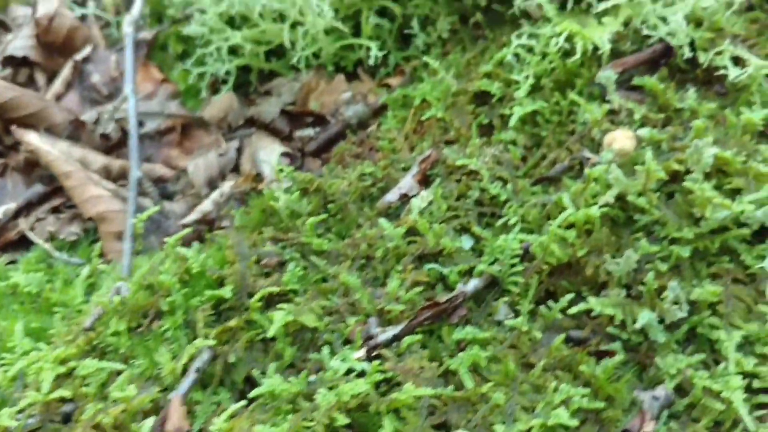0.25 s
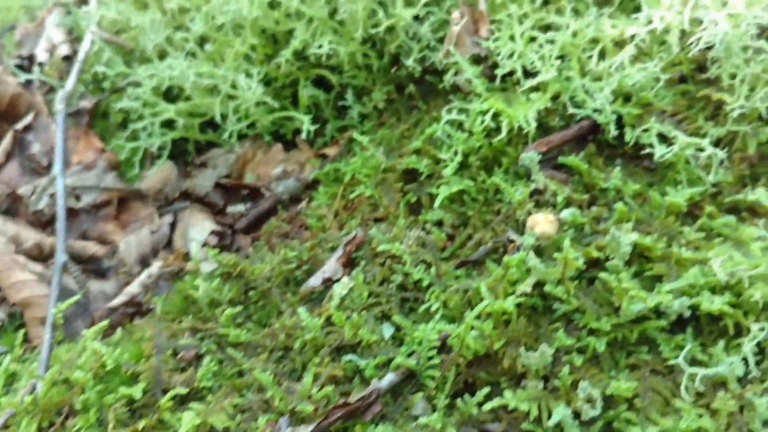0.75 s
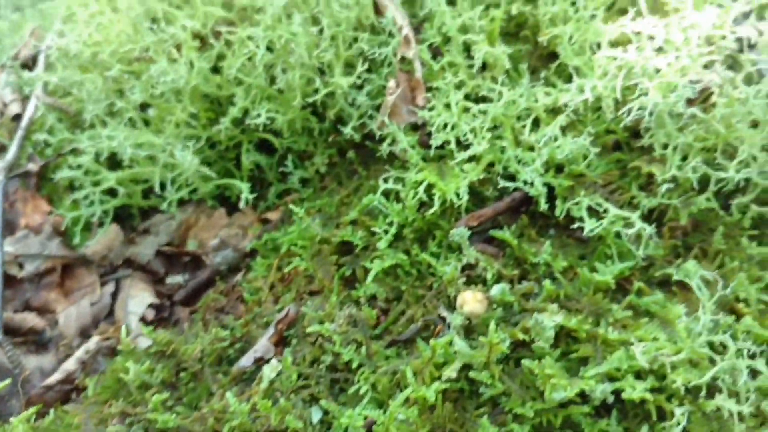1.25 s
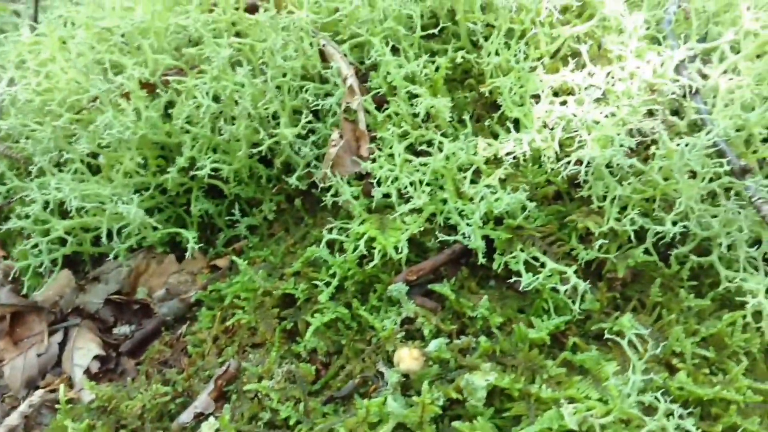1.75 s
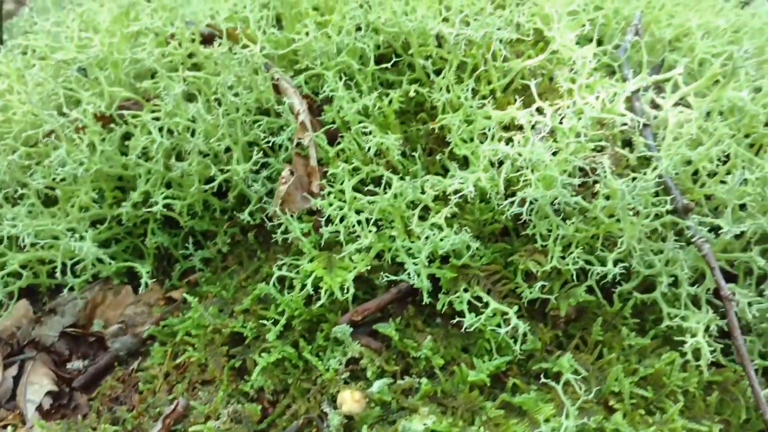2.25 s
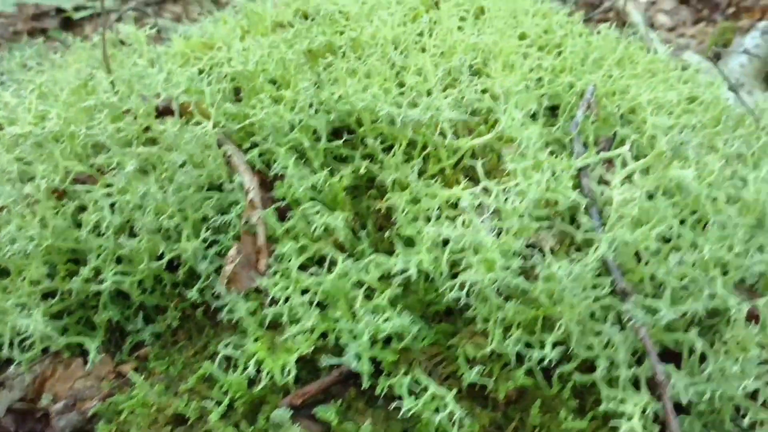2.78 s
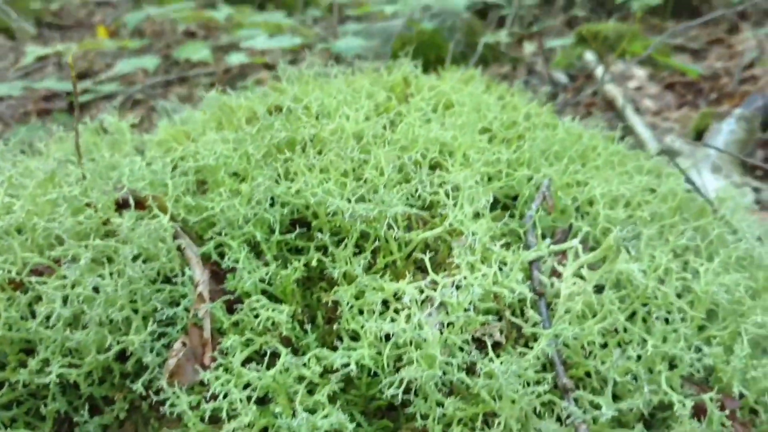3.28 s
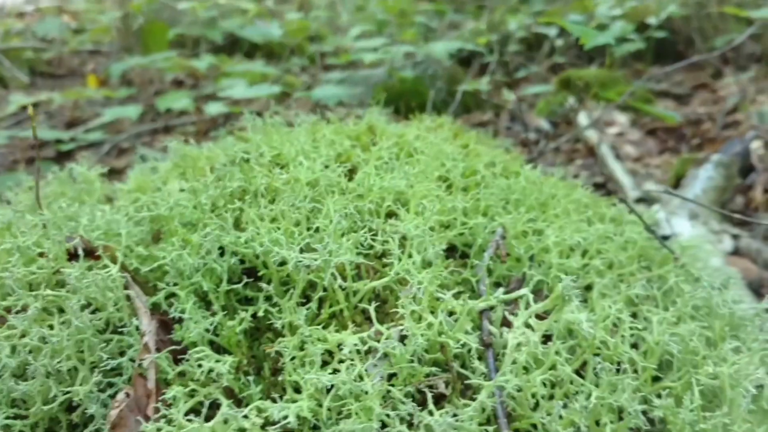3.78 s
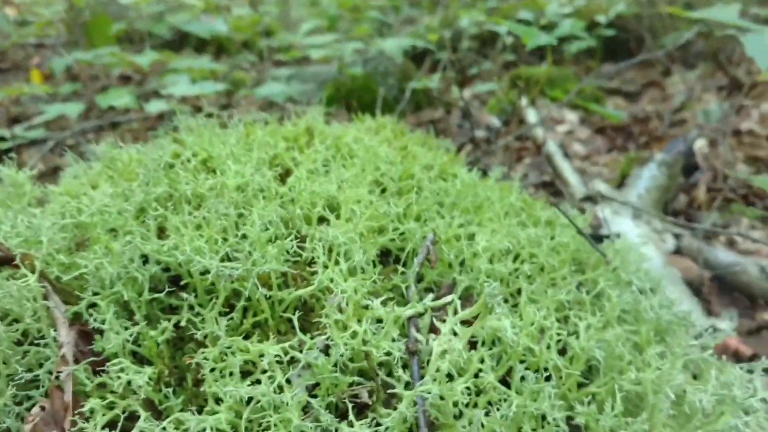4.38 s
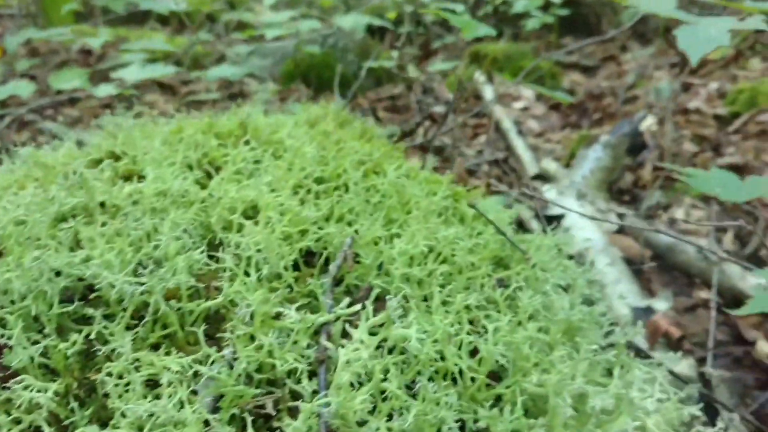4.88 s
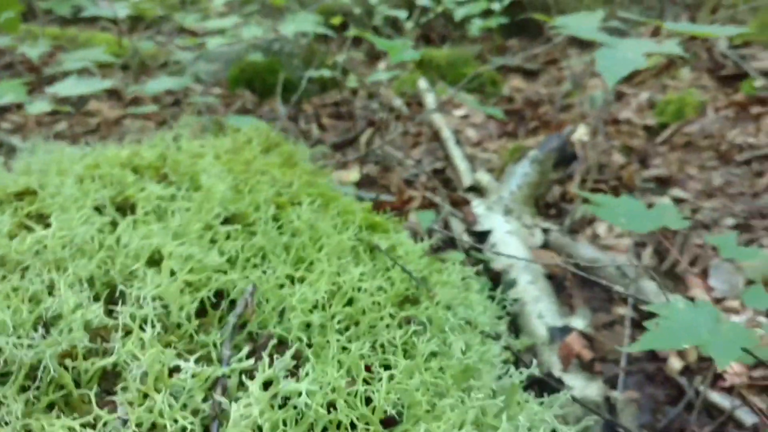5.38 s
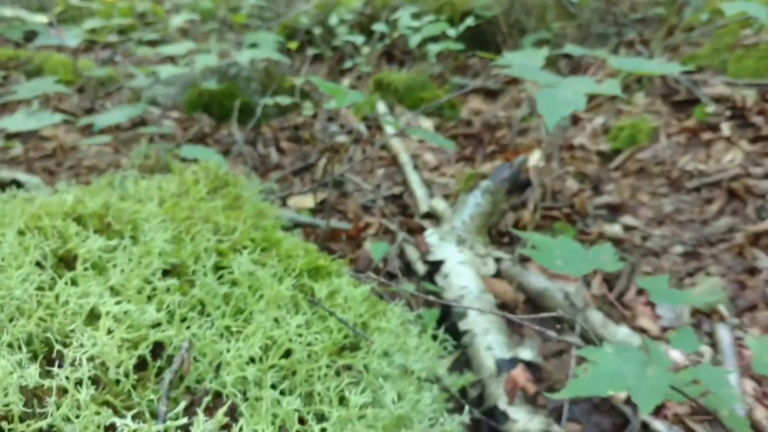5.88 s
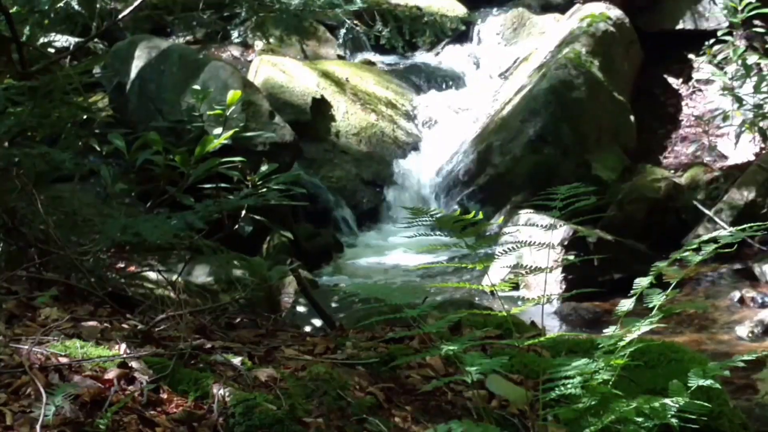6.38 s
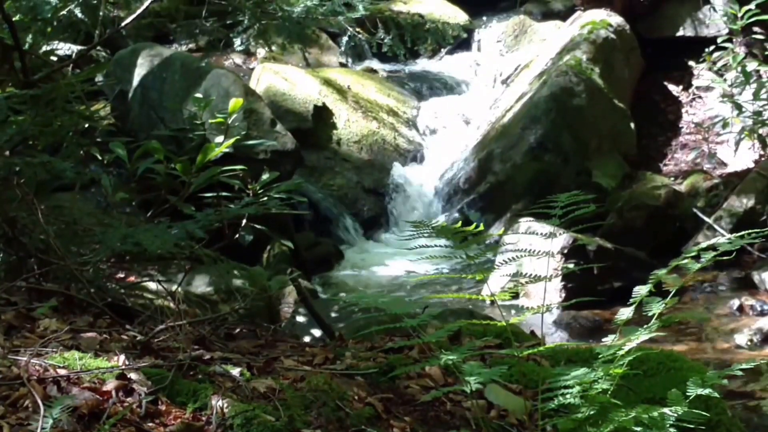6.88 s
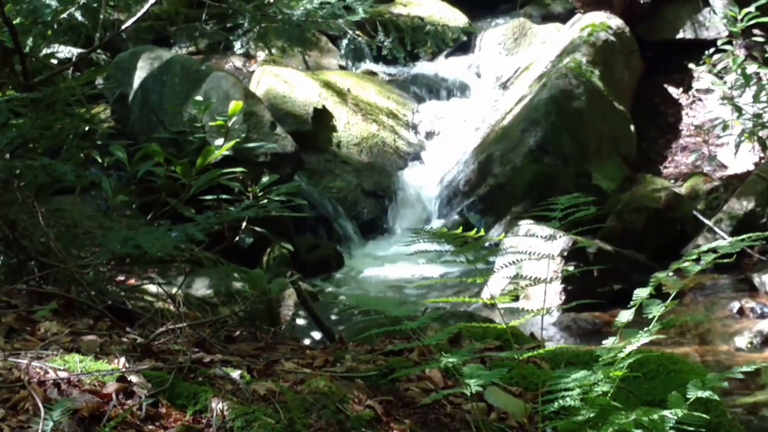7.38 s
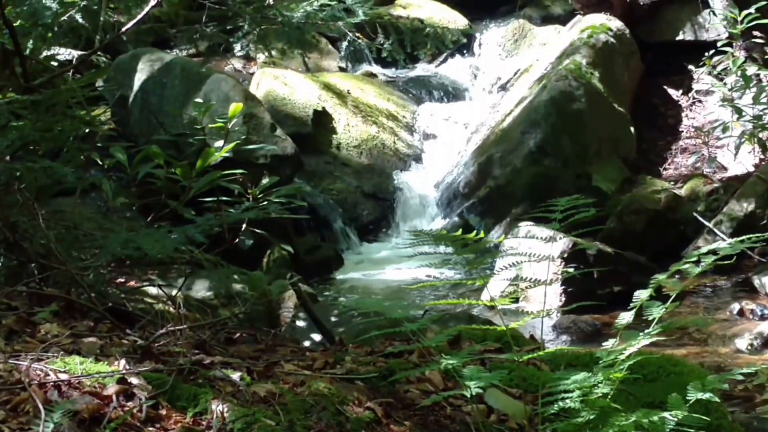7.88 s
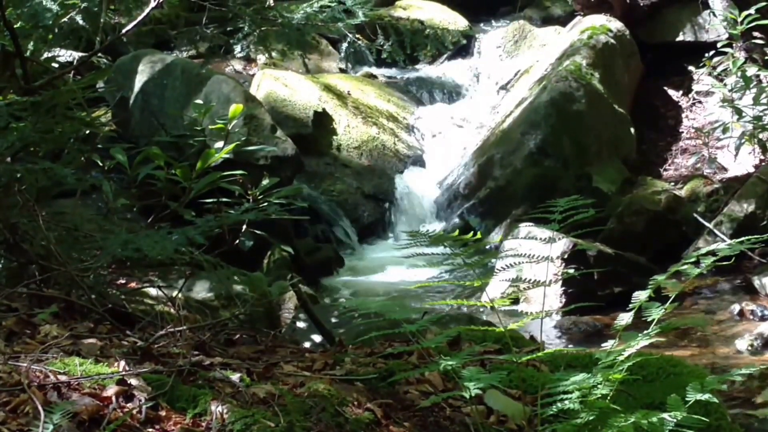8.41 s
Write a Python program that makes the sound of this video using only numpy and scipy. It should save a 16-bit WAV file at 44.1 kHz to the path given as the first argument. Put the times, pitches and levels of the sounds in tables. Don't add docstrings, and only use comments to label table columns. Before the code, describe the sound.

Quiet, blurred water noise from far off fills the first part, with muffled handling bumps clustering late on the right side. Sound drops out for an instant, then swells quickly into near white water among rocks: a much louder, wide, bright wash, irregular round gurgles and small surges. Outdoor stereo from a small handheld camera, slightly hollow and phasey.

```python
import sys
import numpy as np
from scipy import signal
from scipy.fft import rfft, irfft, next_fast_len
from scipy.io import wavfile
from scipy.ndimage import uniform_filter1d

SR = 44100
rng = np.random.default_rng(int(sys.argv[2]) if len(sys.argv) > 2 else 0)


def volts_from_decibels(level):
    exponent = np.asarray(level, float) / 20
    return 10 ** exponent


def wrap_up_sound(samples):
    columns = np.atleast_2d(samples).T
    tamed = np.clip(columns, -1, 1)
    steps = np.round(tamed * 32767).astype(np.int16)
    wavfile.write(sys.argv[1], SR, steps)


N = 381465
CUT_S, RESUME_S = 6.242, 6.35
TURN_S, TURN_LOUDER_DB, TURN_WARMTH_DB = 2.75, 2.0, 4.5
FADE_IN_DB, FADE_IN_S = -21, 0.11
POOL_RING_DB, POOL_RING_S, POOL_REST_DB = 3.5, 0.05, -1.5
GRIP_REST_DB = -60

# frequency in Hz, sum level in dB per Hz, difference minus sum in dB,
# likeness of difference to sum (0-1), phase of difference in rad.
FAR_WATER = [(60, -82, -3, .3, -.6), (104, -75, -8, .61, 0.13), (150, -63, -12, 0.85, -0.48),
             (224, -71, -9.5, .5, 0.2), (370, -75.5, -8.5, .55, -0.41), (710, -79, -3, .46, -0.0074),
             (1350, -82, -0.5, 0, -1.6), (2600, -82, 0.5, 0.2, -.4), (3660, -83, -.5, .1, -.4),
             (5240, -85.5, 0.5, .2, 0), (7700, -89.5, 0, 0.4, -.1), (10500, -95, -0.5, 0.3, 0),
             (12600, -99, -2, .1, .3), (14900, -105, -1, .1, 1.6)]
# frequency in Hz, sum level in dB per Hz, difference minus sum in dB,
# likeness of difference to sum (0-1), phase of difference in rad.
NEAR_WATER = [(60, -74.5, -13, .81, -2), (101, -62, -12, 0.85, -0.2), (150, -60.5, -8.5, .95, -1),
              (203, -53, -14, 0.73, -0.96), (430, -63, -6, 0.67, -1.16), (594, -56.5, -10, .78, -1.3),
              (740, -57, -6.5, .9, -1.3), (850, -63.5, -0.5, 0.82, -1.2), (1290, -64, -6.5, 0.45, -3),
              (2610, -67.5, 3, 0.39, -0.42), (3870, -69, -2, .39, 1.7), (4900, -69.5, -4, 0.18, 0.5),
              (8700, -75.5, 1, 0.52, -0.9), (15200, -84.5, -4, .09, 2.5)]
# peak time in seconds, peak level in dB, pitch in Hz, cycles above half height.
GLUGS = [(6.415, -33, 680, 2.1), (6.4523, -21, 590, 2.3), (6.4896, -15.5, 656, 3.3), (6.753, -19, 700, 2.2),
         (6.7936, -9.5, 610, 3), (6.898, -11, 620, 2.1), (7.0178, -15, 610, 5), (7.1997, -10, 654, 6.3),
         (7.2127, -12, 660, 1.5), (7.252, -12, 850, 1.7), (7.3134, -15, 745, 6.4), (7.395, -16, 604, 5),
         (7.4189, -13, 630, 2.2), (7.4261, -8.5, 674, 2.6), (7.4382, -16, 695, 2.6), (7.447, -18, 640, 4.2),
         (7.5035, -19, 750, 2.2), (7.6814, -13.5, 740, 2), (7.7222, -16, 746, 2.6), (7.8477, -20, 670, 2.2),
         (8.0037, -15.5, 760, 2.3), (8.0119, -16, 730, 3.1), (8.032, -26, 920, 4.8),
         (8.2449, -26, 694, 4.7), (8.4943, -16, 724, 1.8), (8.509, -26, 730, 4.1)]
# peak time in seconds, peak level in dB, pitch in Hz, cycles above half height.
PLOPS = [(6.424, -30, 1390, 2.2), (6.6025, -14.5, 1570, 2.4), (6.6407, -15.5, 1380, 3),
         (6.74, -10, 1290, 1.8), (6.795, -3, 1290, 2.8), (6.805, -11, 1260, 3.4), (7.021, -14, 1760, 5),
         (7.076, -14, 1770, 7.3), (7.1012, -11, 1900, 3.5), (7.1886, -15.5, 1240, 9.2),
         (7.2106, -9, 1360, 1.7), (7.3819, -16, 1290, 2.2), (7.5484, -13, 1380, 2), (7.755, -18, 1300, 2.4),
         (7.942, -14.5, 1430, 5.2), (8.006, -13, 1290, 4.3), (8.018, -16, 1250, 4.2),
         (8.3887, -14, 1350, 2.2), (8.433, -17, 1330, 3.8), (8.572, -15, 1480, 4.5)]
# start in seconds, peak level in dB, pitch in Hz, length in cycles, tick level in dB.
KNOCKS = [(2.911, -32, 170, 1.3, -36), (4.635, -32, 130, 2.1, -55), (4.769, -40, 150, 1.5, -36),
          (4.83, -24.5, 141, 1.8, -26), (4.877, -32, 140, 2., -41), (4.953, -29, 150, 2., -37),
          (5.1, -25, 112, 2.7, -55), (5.33, -47, 150, 1.5, -30), (5.3659, -28, 161, 1.8, -22),
          (5.59, -27, 125, 2, -20), (5.612, -25, 120, 0.94, -40), (5.738, -29, 130, 2.1, -45),
          (6.063, -27.5, 131, 5.6, -44)]
# centre in seconds, rumble level in dB, width at half height in seconds.
SHIFTS = [
    (4.84, -40.5, 0.23),
    (4.963, -48, 0.089),
    (5.15, -51, 0.33),
    (5.6, -48, 0.39),
    (5.97, -48, 0.078),
    (6.24, -44, 0.11),
]
# centre in seconds, level change in dB, width at half height in seconds.
SURGES = [
    (6.757, 2.5, 0.065),
    (6.862, -1.5, 0.2),
    (7.306, -1.1, 0.07),
    (7.44, 1, 0.14),
    (7.612, -3, 0.063),
    (8.04, -1, 0.087),
    (8.2, 0.5, 0.093),
    (8.53, 1.5, 0.29),
    (8.65, -3.5, .04),
]
# frequency in Hz, share (0-1).
CROSS_SHARE = [(100, 0.76), (1250, 0.72), (2500, 0.88), (3850, 0.71), (5200, 0.58), (7800, 0.47),
               (10400, 0.51), (11790, 0.2), (13000, .85), (14200, 0.5), (15200, 0.5)]


def evened(x):
    return x / np.sqrt(np.mean(x ** 2) + 1e-20)


def columns(table, at, warp=np.asarray):
    place, *values = np.transpose(table)
    return [np.interp(warp(at), warp(place), v) for v in values]


def add(mix, start_s, sound):
    part = mix[round(start_s * SR):][:len(sound)]
    part += sound[:len(part)]


def bump(t, centre_s, width_s):
    return np.exp(-4 * np.log(2) * ((t - centre_s) / width_s) ** 2)


def swell(hz, cycles, rise):
    half = int(2 * cycles * SR / hz)
    u = np.arange(-half, half) * hz / (cycles * SR)
    envelope = np.exp(-4 * np.log(2) * u ** 2)
    return envelope * np.cos(2 * np.pi * cycles * (u + rise * u ** 2 / 2))


def fizz(per_s, spread_db, cycles, count=22):
    out = np.zeros(N)
    size = volts_from_decibels(spread_db * np.minimum(rng.exponential(1, N), 4))
    bursts = size * (rng.random(N) < per_s / SR)
    kind = rng.integers(0, count, N)
    for k, hz in enumerate(np.geomspace(900, 16000, count)):
        ring = swell(hz, cycles, 0.19)
        out += hz * signal.oaconvolve(bursts * (kind == k), ring)[:N]
    return evened(out)


def water(table, control, low_hz, grain_share, grains, patchy_db, flicker_db):
    share = np.clip(grain_share, 0, 0.9)
    raw = np.sqrt(1 - share) * rng.standard_normal((2, N))
    raw[0] += np.sqrt(share) * grains
    raw[1] += np.sqrt(share) * np.roll(grains, SR)
    hz, t, z = signal.stft(raw, SR, nperseg=1024, noverlap=768)
    sum_db, diff_db, like, phase = (c[:, None] for c in columns(table, hz + 1, np.log))
    level_db, low_db = control(t)
    hump = np.exp(-np.log((hz[:, None] + 1) / low_hz) ** 2 / 0.21)

    chance = rng.standard_normal((len(t), 2 * len(hz) + 1)).T
    smooth = uniform_filter1d(uniform_filter1d(chance[1:], 14, 0), 12, 1)
    patches = evened(smooth).reshape(2, len(hz), -1)
    flicker = evened(uniform_filter1d(chance[0], 5))

    gain_db = sum_db + level_db + low_db * hump + patchy_db * patches[0] + flicker_db * flicker
    gain = volts_from_decibels(gain_db) * np.sqrt(SR / 2)
    like = np.clip(like, 0, 1)
    diff_gain = volts_from_decibels(diff_db + 0.7 * patches[1])
    diff = diff_gain * (like * np.exp(1j * phase) * z[0] + np.sqrt(1 - like ** 2) * z[1])
    ports = gain * np.array([z[0] + diff, z[0] - diff])
    return signal.istft(ports, SR, nperseg=1024, noverlap=768)[1][:, :N]


def turning(t):
    away = np.exp(-t / TURN_S)
    return TURN_LOUDER_DB * (0.35 - away), TURN_WARMTH_DB * away


def far_stream():
    bubbles = fizz(per_s=12000, spread_db=1.5, cycles=2.525)
    return water(FAR_WATER, turning, 485, 0.25, bubbles, patchy_db=0.59, flicker_db=0.27)


def thud(hz, cycles, rise, start):
    u = np.arange(int(2 * cycles * SR / hz)) * hz / (cycles * SR)
    shape = (1 - np.exp(-u / start)) * np.exp(-2.5 * u ** 2)
    return shape / shape.max() * np.sin(2 * np.pi * cycles * (u + rise * u ** 2 / 2))


def grip(t):
    return volts_from_decibels(GRIP_REST_DB) + sum(volts_from_decibels(db) * bump(t, s, width_s) for s, db, width_s in SHIFTS)


def hand():
    low = signal.butter(2, [85, 210], "bandpass", fs=SR, output="sos")
    lumps = volts_from_decibels(3.5 * evened(uniform_filter1d(rng.standard_normal(N), 1500)))
    rumble = evened(signal.sosfilt(low, rng.standard_normal(N)) * lumps)
    out = rumble * grip(np.arange(N) / SR)
    for s, db, hz, cycles, tick_db in KNOCKS:
        add(out, s, volts_from_decibels(db) * thud(hz, cycles, rise=-0.05, start=0.081))
        add(out, s, volts_from_decibels(tick_db) * thud(275, 0.99, rise=-0.22, start=0.2))
    return np.array([0.033 * out, -out])


def flow(t):
    fade_db = FADE_IN_DB * np.exp(-np.maximum(t - RESUME_S, 0) / FADE_IN_S)
    surge_db = sum(db * bump(t, s, width_s) for s, db, width_s in SURGES)
    crowd = sum(volts_from_decibels(db) * bump(t, s, POOL_RING_S) for s, db, hz, cycles in GLUGS)
    return fade_db + surge_db, POOL_REST_DB + POOL_RING_DB * np.tanh(crowd / 0.39)


def cascade():
    bubbles = fizz(per_s=9000, spread_db=2.5, cycles=3.1)
    return water(NEAR_WATER, flow, 690, 0.26, bubbles, patchy_db=0.9, flicker_db=0.84)


def pool():
    out = np.zeros(N)
    for s, db, hz, cycles in GLUGS + PLOPS:
        add(out, s - 2 * cycles / hz, volts_from_decibels(db - 7.5) * swell(hz, cycles, 0.092))
    return np.array([volts_from_decibels(1.5) * np.roll(out, shift=6), out])


def scene():
    t = np.arange(N) / SR
    before = np.clip((CUT_S - t) / 0.0022, 0, 1)
    after = np.clip((t - RESUME_S) / 0.0035, 0, 1)
    return before * (far_stream() + hand()) + after * (cascade() + pool())


def band_limit(x):
    return signal.sosfilt(signal.butter(12, 15200, fs=SR, output="sos"), x)


def record(dry):
    size = next_fast_len(N + 4096)
    hz = np.fft.rfftfreq(size, 1 / SR)
    delay_rad = 2 * np.pi * hz * 16.794 / SR
    filter_lag_rad = 0.32 * hz / (hz + 400) + 1.1 * (hz / 15300) ** 15.0
    share = np.clip(columns(CROSS_SHARE, hz + 1, np.log)[0], 0, 0.99)
    cross = share * np.exp(-1j * (delay_rad + filter_lag_rad))
    band = 1 / np.sqrt((1 + (50 / (hz + 1)) ** 3) * (1 + (hz / 15150) ** 40))
    both = rfft(dry, size)
    wide = irfft(band * (both - cross * both[::-1]), size)[:, :N]
    return band_limit(wide)


dry = scene()
out = record(dry)
wrap_up_sound(out)
```